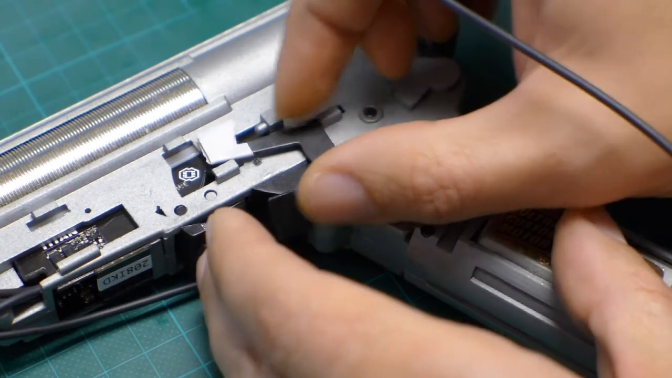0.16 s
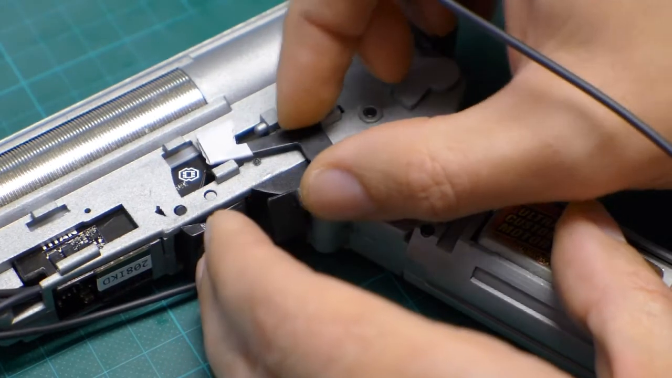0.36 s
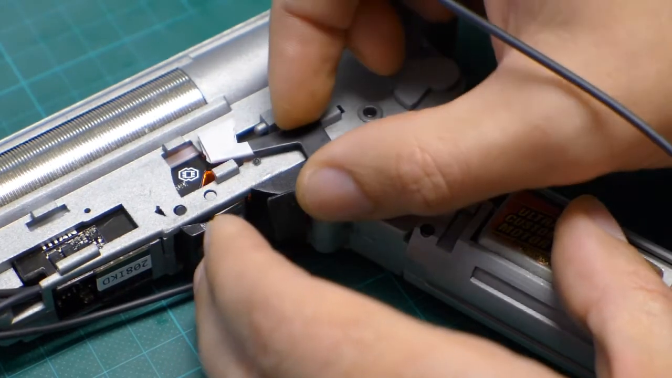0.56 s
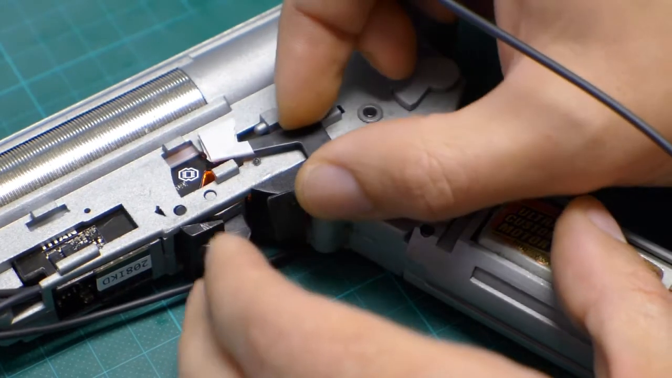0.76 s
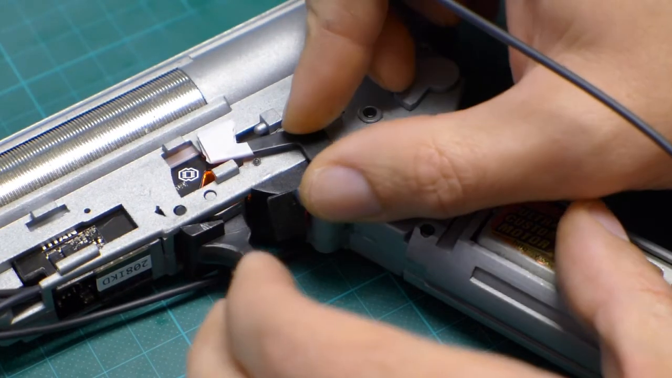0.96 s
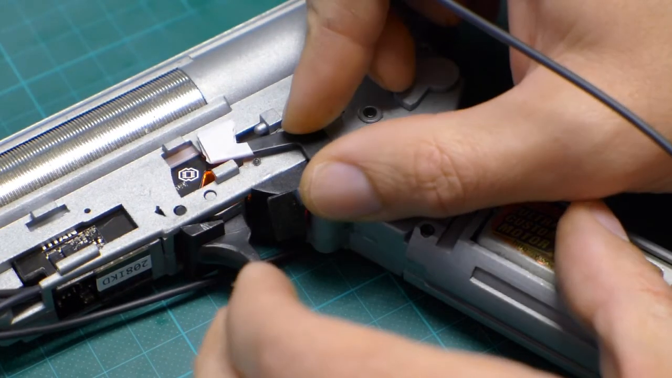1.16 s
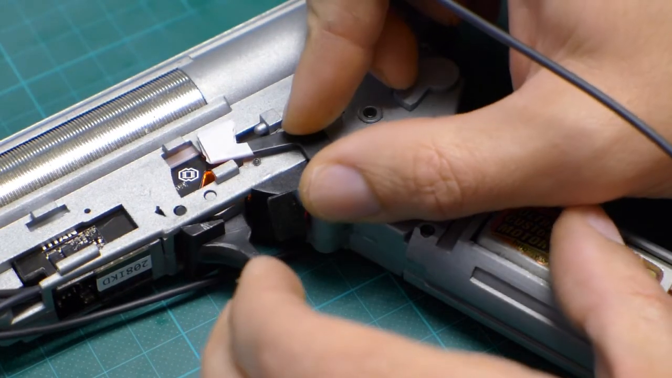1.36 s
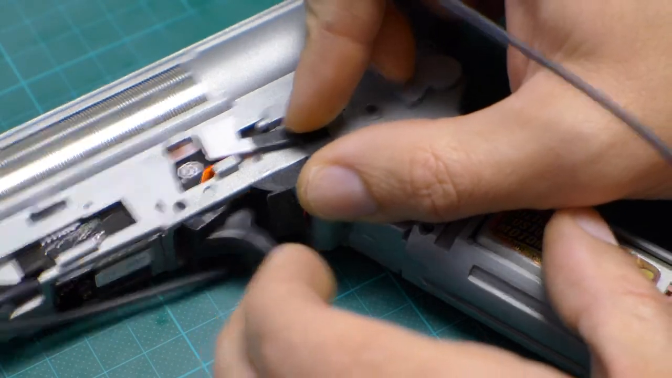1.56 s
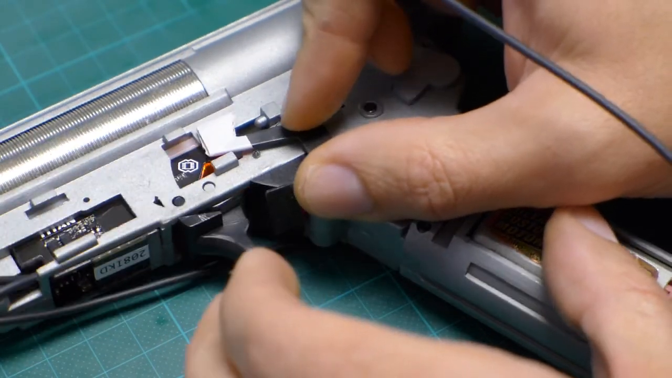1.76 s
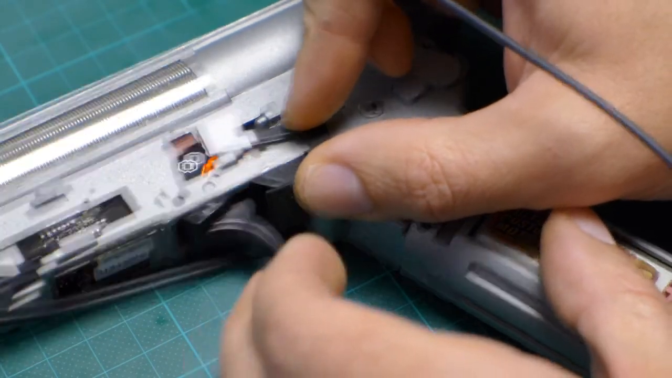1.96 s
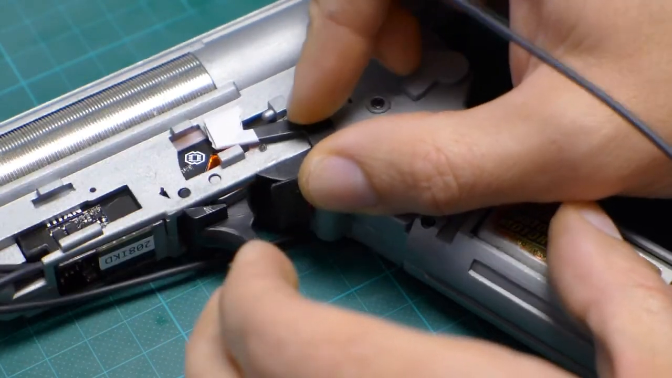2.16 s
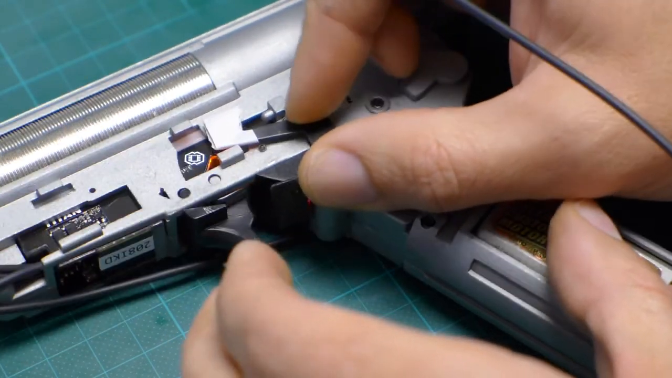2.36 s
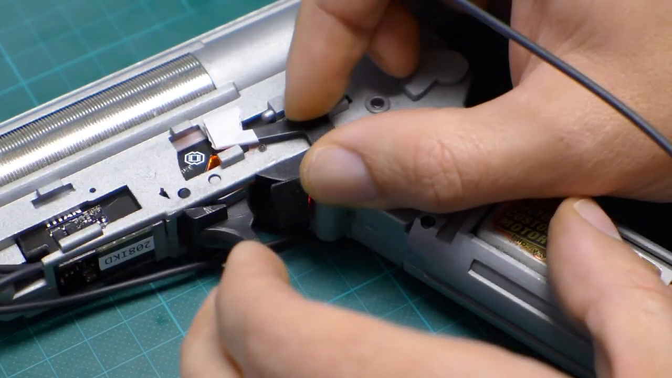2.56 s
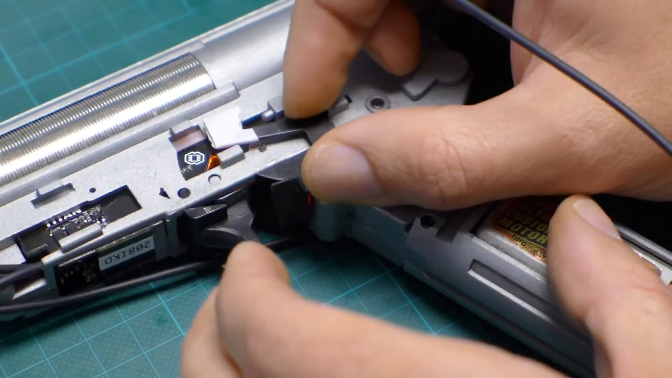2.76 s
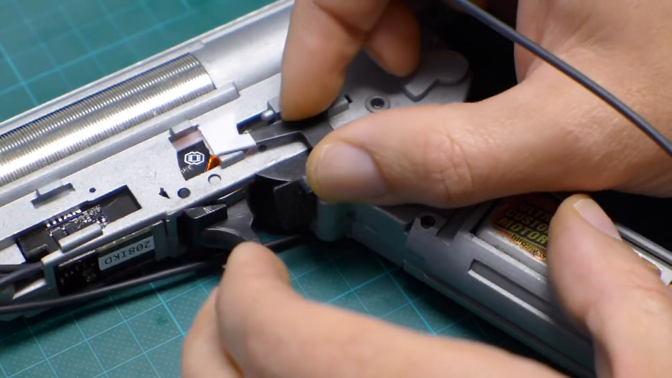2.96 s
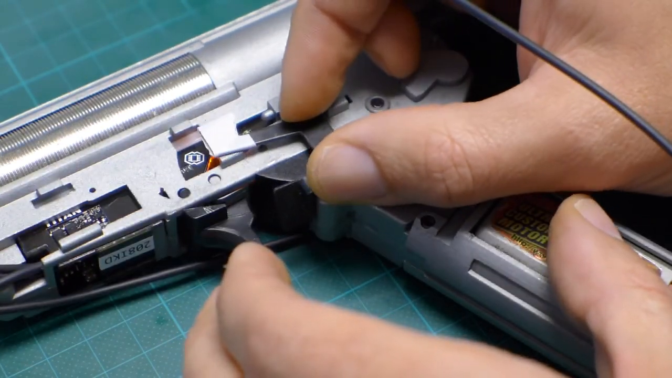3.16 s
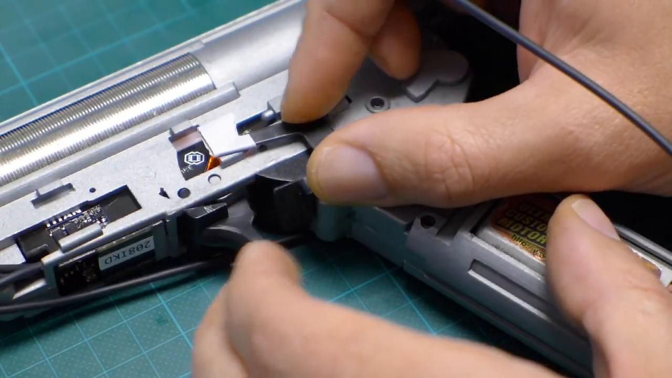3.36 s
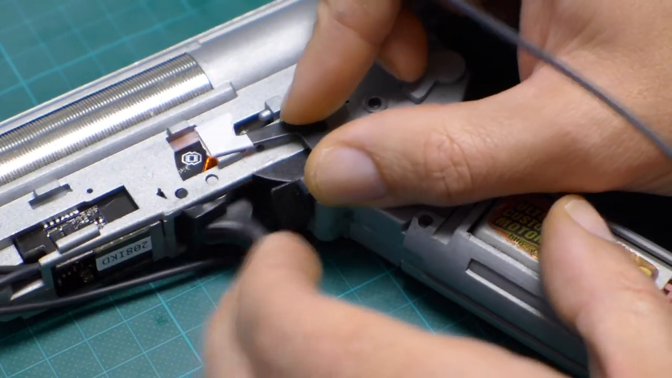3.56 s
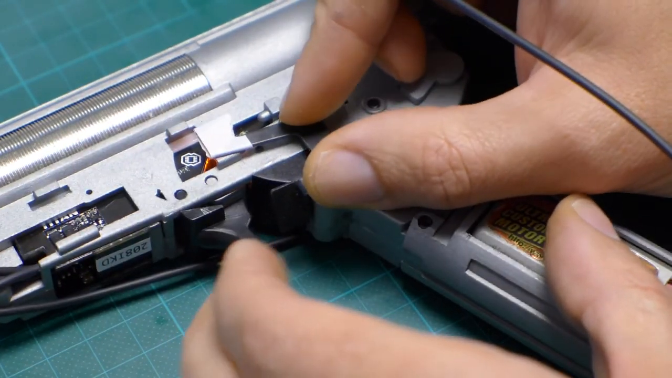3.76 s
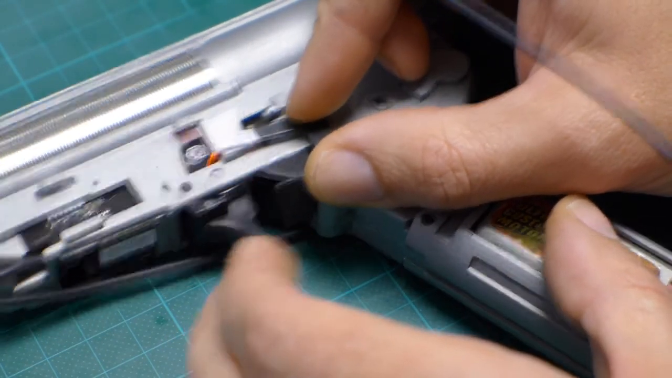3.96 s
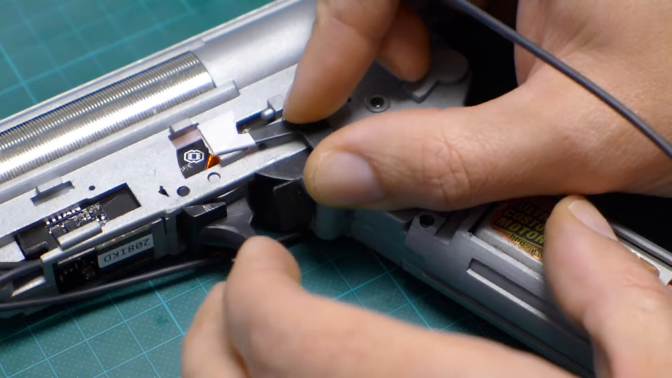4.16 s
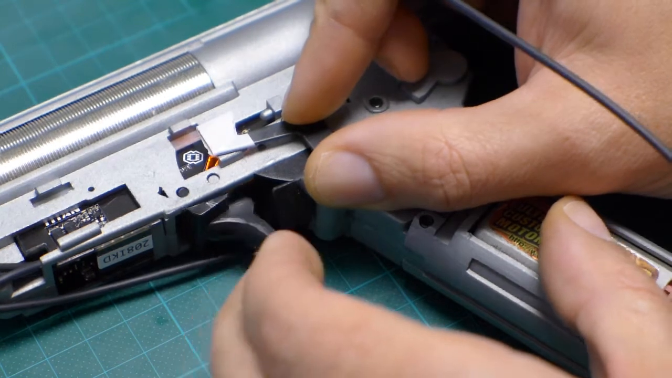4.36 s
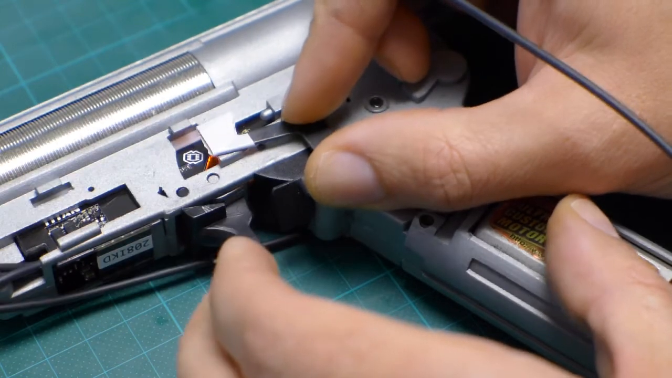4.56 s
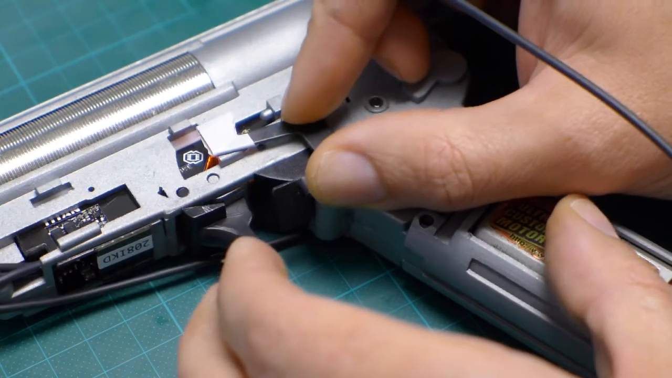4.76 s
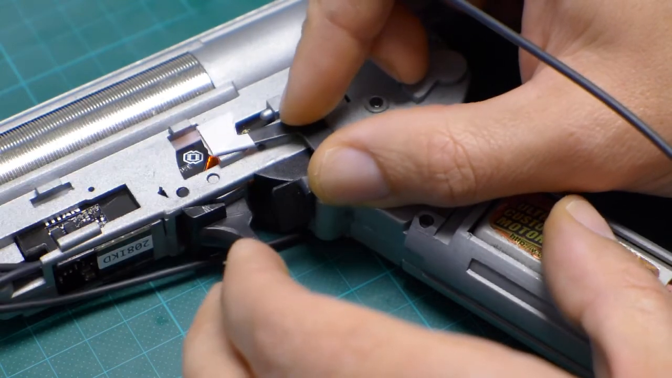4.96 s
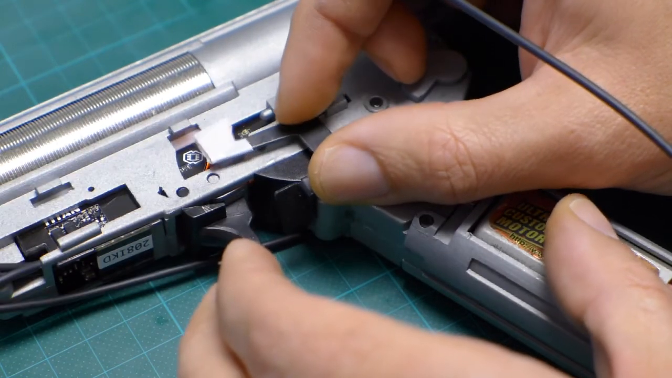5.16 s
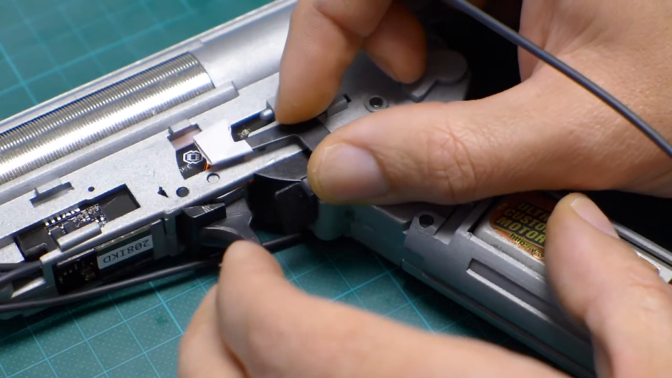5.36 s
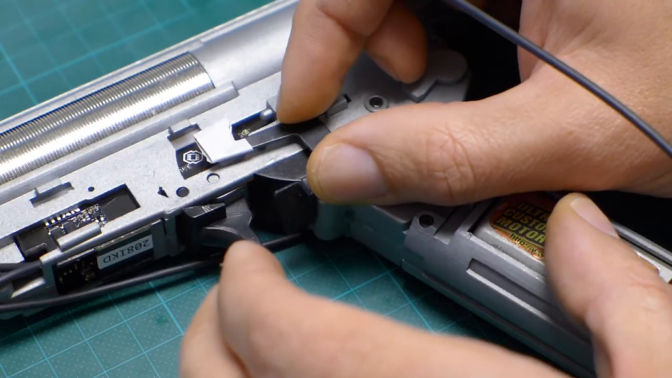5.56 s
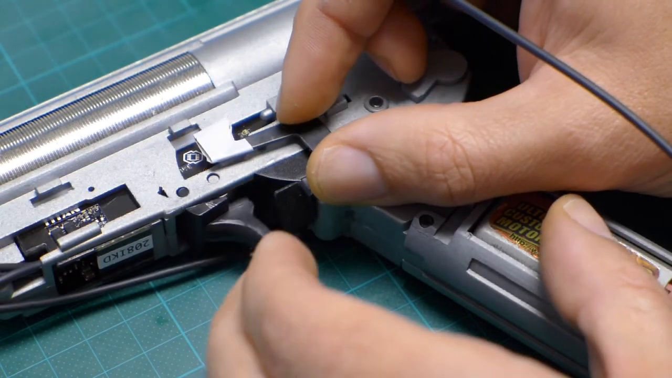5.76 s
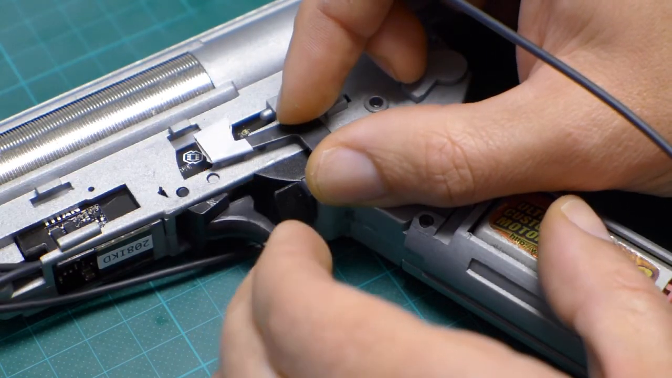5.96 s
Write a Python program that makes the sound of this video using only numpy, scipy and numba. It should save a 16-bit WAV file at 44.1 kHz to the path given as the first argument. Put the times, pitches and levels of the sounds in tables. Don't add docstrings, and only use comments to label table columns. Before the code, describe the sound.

A small electric gearbox on a workbench fires five short bursts of harsh gear rasp and sharp piston slams, with faint spring ringing between.

```python
import sys
import numpy as np
from scipy import signal
from scipy.fft import rfft, irfft, next_fast_len
from scipy.io import wavfile
from scipy.ndimage import uniform_filter1d
from numba import njit

SR = 44100
rng = np.random.default_rng(int(sys.argv[2]) if len(sys.argv) > 2 else 0)


def store_pcm(level_fs):
    pcm = np.round(np.clip(level_fs, -1, 1) * 32767).astype(np.int16)
    wavfile.write(sys.argv[1], SR, np.atleast_2d(pcm).T)


def amplitude_ratio(level_db):
    exponent = np.asarray(level_db, float) / 20
    return 10 ** exponent


N = 264291

# frequency in Hz, level in dB per Hz.
MURMUR = [(20, -25.5), (70, -17), (114, -9), (300, -6.5), (700, -9), (2500, -17), (3250, -56.5),
          (5500, -120)]
# frequency in Hz, level in dB per Hz.
HISS = [(590, -27.5), (1000, 1.5), (1840, -1.5), (1990, -12), (2470, -2), (3600, -3.5), (5340, -0.5),
        (15500, -11.5)]
# frequency in Hz, likeness from -1 to 1.
MURMUR_ALIKE = [(60, 0.9), (180, -0.073), (550, 0.01), (1650, -0.7), (4970, -0.29), (15000, 0.097)]
# time in seconds, gain in dB.
CAMERA_GAIN = [(0, 2), (.6, 2), (1.4, 1.14), (2.701, -2), (3.4, -2.5), (5.05, -6), (5.99, -4)]
# time in seconds, peak in dB, centre in Hz, width in Hz, 60 dB fade in seconds.
CLICKS = [(0.0946, -55, 5500, 4000, 0.032), (0.1001, -27.5, 1860, 1310, 0.011),
          (0.1007, -29.5, 5320, 1190, 0.021), (.1022, -35.5, 8980, 12000, 0.013),
          (0.105, -44, 1920, 1600, 0.24), (0.1248, -32.5, 8000, 12000, 0.012),
          (0.126, -47, 5230, 1200, .07), (3.267, -58.5, 4630, 1200, 0.017), (3.342, -49, 2700, 2966, 0.02),
          (5.627, -44.5, 2710, 4500, 0.01), (5.637, -46, 1700, 2500, 0.011)]
# time from that slam in seconds, then columns as in CLICKS.
STIR = [
    (-.103, -58, 900, 400, .2),
    (-.082, -43.5, 1303, 2000, .13),
    (-.0578, -1.5, 2935, 1000, .012),
]
# frequency in Hz, level in dB, 60 dB fade in seconds.
BENCH_TONE = (212, -46, .2)
# first slam in seconds, number of slams.
PULLS = [
    (1.5453, 2),
    (1.9726, 3),
    (3.5109, 1),
    (3.8932, 2),
    (4.3968, 2),
]
# rasp at the start in dB, piston drop at the catch in dB,
# upper spring tones in dB.
PULL_LEVELS = [
    (-13, -8.5, 1.5),
    (-10.5, -8.5, 3.6),
    (-12.5, -17, 3.5),
    (-14, -6, -5),
    (-14, -11.5, -22),
]
# frequency in Hz, width in Hz, level in dB.
SHELL = [(211, 100, -8), (436.2, 40, -3.5), (610, 77, -0.5), (900, 260, 3), (1270, 810, -7.5),
         (2020, 1100, -4), (2430, 420, -19.5), (3622, 1400, -4), (4890, 830, -7), (6400, 1400, -6),
         (7590, 1800, -8), (11500, 2700, -14.5), (15300, 2400, -24.5)]
SHELL_SIGNS = [1, -1, 1, -1, 1, 1, -1, -1, -1, 1, -1, 1, -1]
# frequency in Hz, likeness.
NEAR_ALIKE = [(500, 0.9), (1400, 0.32), (4000, 0.52), (8000, 0.55), (14000, 1)]
# frequency in Hz, width in Hz, level in dB.
WHINE = (5000, 280, 0)
# time from the catch in seconds, peak in dB, thud in dB.
JOLTS = [
    (-.0135, -9.5, -13.5),
    (-.0065, -5.5, -16),
]
# time after the last slam in seconds, peak in dB, thud in dB.
KICKBACK = (.0225, -10.5, -9)
PATH_DELAYS = [-3.0, 0, 2.22, 4.22, 7.05, 8.5, 23.2]
PATH_LENGTHS = [.35, .42, .15, .24, .3, .2, .25]
# left in dB, right in dB.
PATH_LEVELS = [(-14, -10), (3, 3), (0, -1), (1, -1), (-9, -11), (-9, -9), (-12, -12)]
# frequency in Hz, level in dB, 60 dB fade in seconds.
THUD = [(476, -16.5, 0.038), (221, -27.5, .07)]
SPRING_HZ = [662, 290, 996]
# level in dB, 60 dB fade in seconds, flutter in dB.
SPRING = [(-58, 4, 1.2), (-62, 6, 5), (-68, 1.5, 2)]
TOUCHES = [3.28, 5.1]
# frequency in Hz, 60 dB fade in seconds.
ROOM_FADE = [(150, 0.25), (600, 0.41), (2100, 0.56), (3300, 0.47), (5000, 0.48), (7500, 0.43),
             (10000, 0.34), (14000, 0.31)]
# frequency in Hz, likeness.
ROOM_ALIKE = [(60, 0.8), (180, 0.88), (550, 0.93), (1650, 0.71), (4970, 0.39), (15000, 0.31)]
# frequency in Hz, left minus right in dB.
LEAN = [(60, 3), (180, -1), (550, 1), (1650, -3.5), (4970, -1.5), (15000, -1.5)]
# frequency in Hz, width in Hz, depth from 0 to 1.
BENCH_DIPS = [(1560, 260, .75), (2850, 400, .9)]

MURMUR_DB, HISS_DB = -65.5, -69.5
HISS_FOLLOWS = 1.3
CYCLE_S = .0675
WIND_S, CATCH_S = .0712, .0571
OFF_S = .026
RUN_DB = -19
SAG_DB = -1.5
BRIGHT_DB = -6
COAST_S = 0.41
GRAIN_DB, PATCHY_DB = 4.0, 1.3
SLAM_DB, FIRST_DB = 0.42, 1.5
LOW_TONE_DB = -6.5
OFFSET = -.0028


def unit(x):
    return x / np.sqrt(np.mean(x ** 2) + 1e-20)


def along(points, hz):
    f, v = np.transpose(points)
    return np.interp(np.log(hz + 1), np.log(f + 1), v)


def filtered(x, response):
    n = x.shape[-1]
    m = next_fast_len(n + SR // 2)
    return irfft(rfft(x, m) * response(np.fft.rfftfreq(m, 1 / SR)), m)[..., :n]


def peak(f, hz, width):
    return 1j * f * width / (hz * hz - f * f + 1j * f * width)


def shell(f):
    return sum(sign * amplitude_ratio(db) * peak(f, hz, width) for sign, (hz, width, db) in zip(SHELL_SIGNS, SHELL))


def pair(noise, alike):
    def turn(hz):
        angle = np.arccos(np.clip(along(alike, hz), -1, 1)) / 2
        return np.array([np.cos(angle), np.sin(angle)])
    mid, side = filtered(noise, turn)
    return np.array([mid + side, mid - side])


def last_slam(first, count):
    return first + CYCLE_S * (count - 1)


def rush(shape, alike):
    noise = pair(rng.standard_normal((2, N)), alike)
    return unit(filtered(noise, lambda hz: amplitude_ratio(along(shape, hz))))


def air():
    gain_db = np.interp(np.arange(N) / SR, *np.transpose(CAMERA_GAIN))
    murmur = amplitude_ratio(MURMUR_DB + gain_db) * rush(MURMUR, MURMUR_ALIKE)
    hiss = amplitude_ratio(HISS_DB + HISS_FOLLOWS * gain_db) * rush(HISS, [(1000, 0.095)])
    return murmur + hiss


def clicks():
    out, t = np.zeros(N), np.arange(6000) / SR
    stirs = [(first + s, *rest) for first, _ in PULLS for s, *rest in STIR]
    for s, db, hz, width, t60 in CLICKS + stirs:
        noise = rng.standard_normal(len(t))
        tick = filtered(noise, lambda f: peak(f, hz, width) ** 2 * (0.1 + np.abs(shell(f))))
        onset = np.minimum(t / .0007, 1)
        out[round(s * SR):][:len(t)] += amplitude_ratio(db - 3.5 - 60 * t / t60) * onset * unit(tick)
    return out


def tone(s, hz, db, t60):
    t = np.arange(N) / SR
    return (t > s) * amplitude_ratio(db - 60 * np.abs(t - s) / t60) * np.sin(2 * np.pi * hz * (t - s))


def bench_thump():
    swell = np.clip((np.arange(N) / SR - .104) / 0.059, 0, 1)
    return 2 * swell * tone(0.11, *BENCH_TONE)


def shake():
    t = np.arange(N) / SR
    kick = sum((t > s - WIND_S) * amplitude_ratio(-60 * np.abs(t - s + WIND_S) / 1.1) for s, _ in PULLS)
    rumble = unit(filtered(rng.standard_normal((2, N)), lambda f: peak(f, 35, 50) ** 2))
    return amplitude_ratio(-53.5) * kick * rumble


def chatter(depth_db):
    z = signal.stft(rng.standard_normal((2, N)), nperseg=128)[2]
    flare = uniform_filter1d(rng.standard_normal(z.shape[1:]), size=2, axis=0)
    flare = uniform_filter1d(flare, size=5, axis=1)
    return signal.istft(z * amplitude_ratio(depth_db * unit(flare)), nperseg=128)[1][:, :N]


def gears():
    t = np.arange(N) / SR
    force_db = GRAIN_DB * unit(uniform_filter1d(rng.standard_normal(N), size=24))
    force_db += PATCHY_DB * unit(uniform_filter1d(rng.standard_normal(N), size=200))
    contacts = chatter(depth_db=4.0) * amplitude_ratio(force_db)
    rasp = unit(filtered(pair(contacts, NEAR_ALIKE), shell))
    whine_hz, whine_width, whine_db = WHINE

    def grind_bands(f):
        whine = amplitude_ratio(whine_db) * np.abs(peak(f, whine_hz, whine_width)) ** 2
        return np.abs(peak(f, 6500, 6800)) ** 2 + whine
    grind = filtered(rasp, grind_bands)
    sizzle = filtered(rasp, lambda f: f ** 6 / (f ** 6 + 5500.0 ** 6))
    out = np.zeros((2, N))
    for (first, count), (start_db, _, _) in zip(PULLS, PULL_LEVELS):
        start, off = first - WIND_S, last_slam(first, count) + OFF_S
        coasting = np.maximum(t - off, 0)
        level_db = np.interp(t, [start, first, first + OFF_S], [start_db, start_db + SAG_DB, RUN_DB])
        level_db = level_db - 60 * coasting / COAST_S
        rise = np.clip((t - start + .005) / .013, 0, 1) ** 2
        strain = amplitude_ratio(BRIGHT_DB + 4) * np.exp(-np.maximum(t - first, 0) / .015)
        dull = 1 - np.exp(-coasting / 0.011)
        out += amplitude_ratio(level_db) * rise * (rasp + strain * grind - dull * sizzle)
    return out


def slack():
    starts = [(first - CATCH_S + s, db, thud_db) for first, _ in PULLS for s, db, thud_db in JOLTS]
    delay, *levels = KICKBACK
    return starts + [(last_slam(first, count) + delay, *levels) for first, count in PULLS]


def knocks():
    out, t = np.zeros(N), np.arange(1500) / SR
    for s, db, thud_db in slack():
        burst = rng.standard_normal(len(t)) * amplitude_ratio(-60 * t / 0.003) * np.minimum(t / .0008, 1)
        blow = filtered(burst, shell)
        low = filtered(blow, lambda f: 1 / (1 + 1j * f / 1500) ** 2)
        high = blow - low
        crack = high / np.abs(high).max() + amplitude_ratio(thud_db) * low / np.abs(low).max()
        out[round(s * SR):][:len(t)] += amplitude_ratio(db - 15.0) * crack
    return out


def slam(ms):
    wave = np.zeros((2, len(ms)))
    for delay, length, (left_db, right_db) in zip(PATH_DELAYS, PATH_LENGTHS, PATH_LEVELS):
        u = ms - delay
        push = -np.tanh(u / .04) * np.exp(-np.abs(u / length) ** 3)
        ring = np.sin(2 * np.pi * 4300 * (u + .85) / 1000 + np.pi)
        ring = 0.44 * (u > -.85) * ring * np.exp(-np.abs(u + 0.95) / 0.97)
        wave += amplitude_ratio([[left_db], [right_db]]) * (push + ring)
    thud = np.zeros(len(ms))
    for hz, db, t60 in THUD:
        thud += (ms > 0) * amplitude_ratio(db - .06 * np.abs(ms) / t60) * np.sin(2 * np.pi * hz * ms / 1000)
    return filtered(wave, lambda f: f ** 2 / (f ** 2 + 490.0 ** 2)) - thud


def piston():
    before = 300
    ms = np.arange(-before, 1500) / SR * 1000
    wave, out = slam(ms), np.zeros((2, N))
    rattle = np.exp(np.minimum(ms / 5.1, -ms / 5))
    blows = []
    for (first, count), (_, catch_db, _) in zip(PULLS, PULL_LEVELS):
        blows.append((first - CATCH_S, catch_db))
        for k in range(count):
            blows.append((first + CYCLE_S * k, SLAM_DB + FIRST_DB * (k == 0)))
    for s, db in blows:
        scrape = amplitude_ratio(-13) * rattle * unit(filtered(rng.standard_normal(len(ms)), shell))
        out[:, round(s * SR) - before:][:, :len(ms)] += amplitude_ratio(db + 3) * (wave + scrape)
    return out


def spring():
    out, t = np.zeros(N), np.arange(N) / SR
    for (first, count), (_, _, upper_db) in zip(PULLS, PULL_LEVELS):
        touch = min(s for s in TOUCHES if s > first)
        damping = amplitude_ratio(-40 * np.maximum(t - touch, 0) / .5)
        start = last_slam(first, count) + OFF_S
        hits_db = (upper_db, LOW_TONE_DB, upper_db)
        for hz, (db, t60, flutter_db), hit_db in zip(SPRING_HZ, SPRING, hits_db):
            flutter = amplitude_ratio(flutter_db * unit(uniform_filter1d(rng.standard_normal(N), size=3000)))
            out += tone(start, hz, db + hit_db, t60) * flutter * damping
    return out


def room(x):
    hz, t, z = signal.stft(rng.standard_normal((2, SR)), SR, nperseg=256)
    fading = z * amplitude_ratio(-60 * t / along(ROOM_FADE, hz)[:, None])
    tail = pair(signal.istft(fading, SR, nperseg=256)[1], ROOM_ALIKE)
    tail = tail / np.linalg.norm(tail[0])
    late = np.pad(x, (200, 0))[None]
    return signal.fftconvolve(late, tail, axes=1)[:, :N]


def to_microphones(hz, share):
    dips = 1
    for centre_hz, width, depth in BENCH_DIPS:
        dips = dips * (1 - share * depth * np.abs(peak(hz, centre_hz, width)))
    sides = amplitude_ratio(along(LEAN, hz) / 2 * np.array([[1], [-1]]))
    return sides * dips / np.sqrt(1 + (150 / (hz + 1)) ** 8 + (hz / 14600) ** 30)


def scene():
    background = air()
    ticks, thump, jump = clicks(), bench_thump(), shake()
    rasp, jolts, slams, singing = gears(), knocks(), piston(), spring()
    blows = filtered(slams[0], lambda f: amplitude_ratio(-4.5) * shell(f))
    wet = amplitude_ratio(-1.5) * room(rasp[0] + jolts + amplitude_ratio(-7.5) * ticks + blows)
    near = filtered(rasp + jolts + ticks + slams, lambda hz: to_microphones(hz, share=0.51))
    far = filtered(wet, lambda hz: to_microphones(hz, share=0.79))
    return near + far + thump + singing + jump + background


@njit
def follower(db, attack, release):
    cut, out = 0., np.empty(len(db))
    for i in range(len(db)):
        cut += (db[i] - cut) * (attack if db[i] > cut else release)
        out[i] = cut
    return out


def low_pass(x):
    return signal.sosfilt(signal.butter(12, 15690, fs=SR, output="sos"), x)


def record(dry):
    power = np.abs(uniform_filter1d(np.mean(dry ** 2, axis=0), size=400))
    level_db = 10 * np.log10(power + 1e-12)
    excess_db = np.maximum(level_db + 38, 0)
    cut_db = follower(0.35 * excess_db, 1 / (0.011 * SR), 1 / (.06 * SR))
    x = dry * amplitude_ratio(4.5 - cut_db)
    clipped = x / (1 + np.abs(x / .95) ** 8) ** (1 / 8)
    return low_pass(clipped + OFFSET)


dry = scene()
out = record(dry)
store_pcm(out)
```